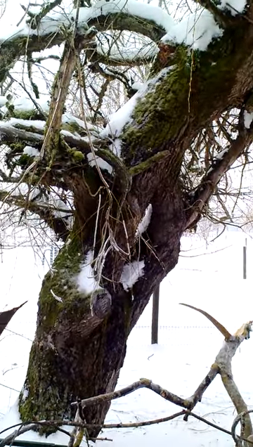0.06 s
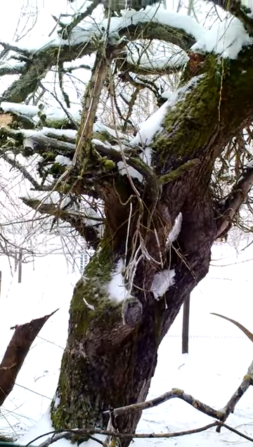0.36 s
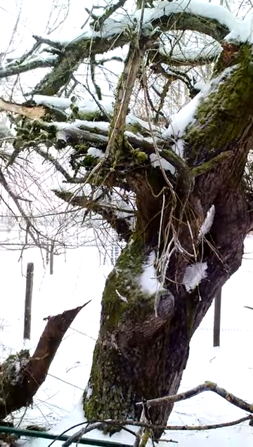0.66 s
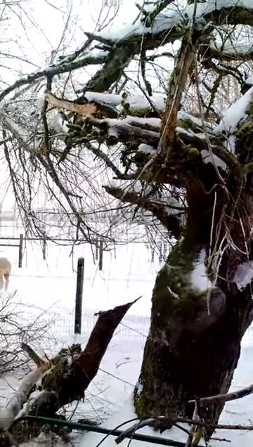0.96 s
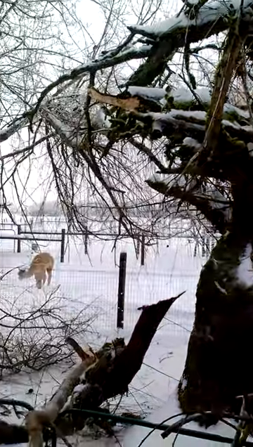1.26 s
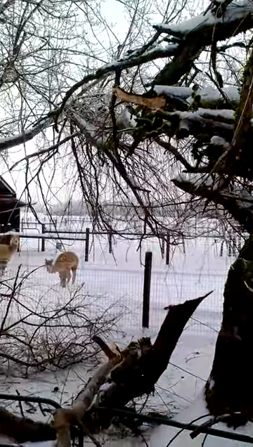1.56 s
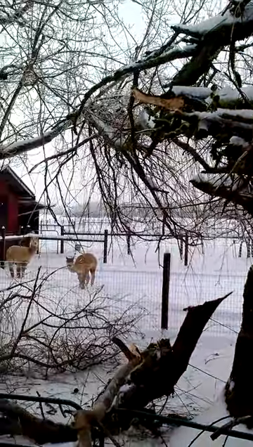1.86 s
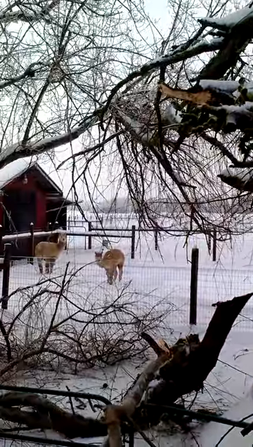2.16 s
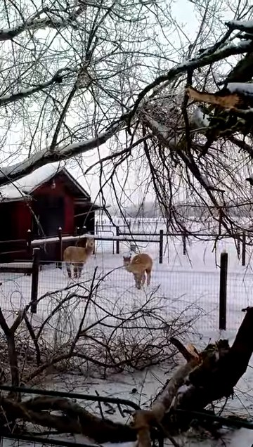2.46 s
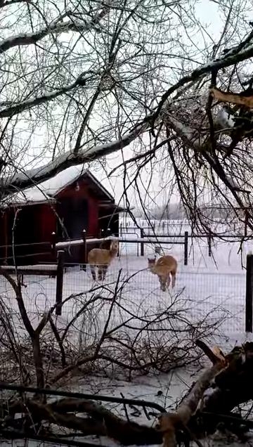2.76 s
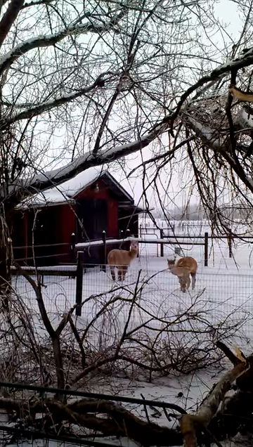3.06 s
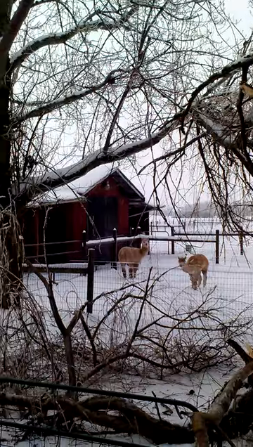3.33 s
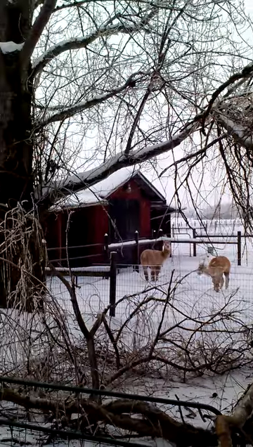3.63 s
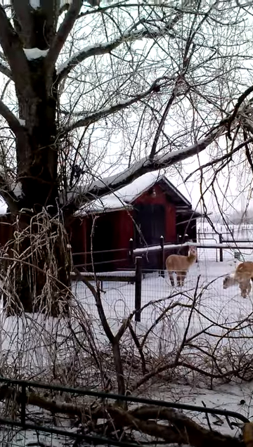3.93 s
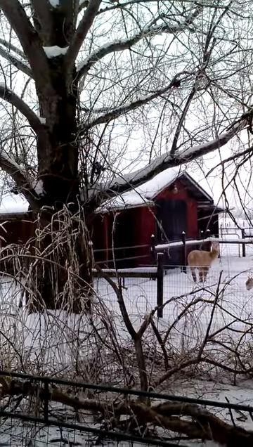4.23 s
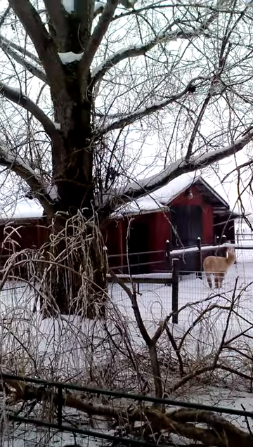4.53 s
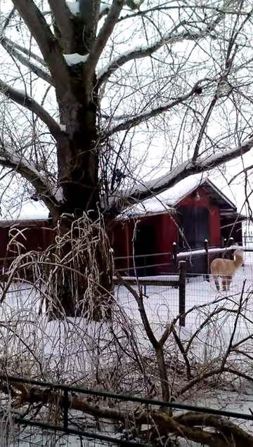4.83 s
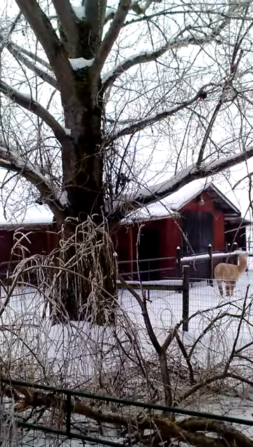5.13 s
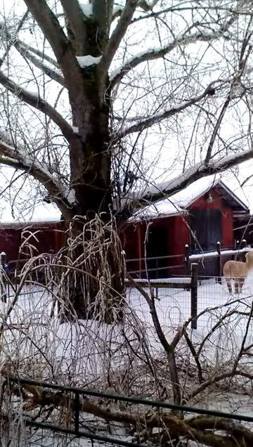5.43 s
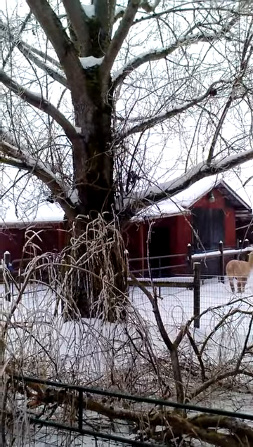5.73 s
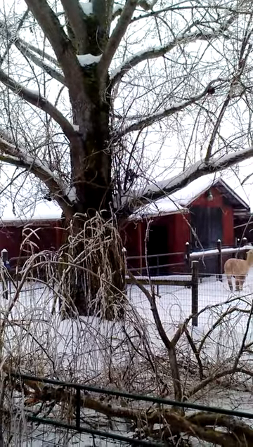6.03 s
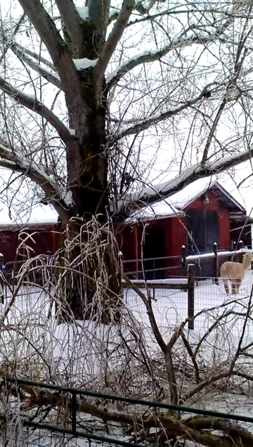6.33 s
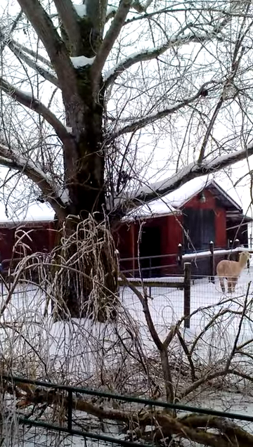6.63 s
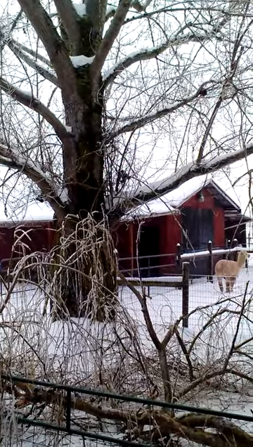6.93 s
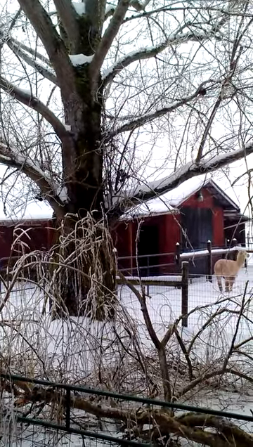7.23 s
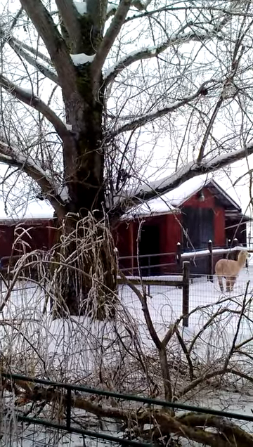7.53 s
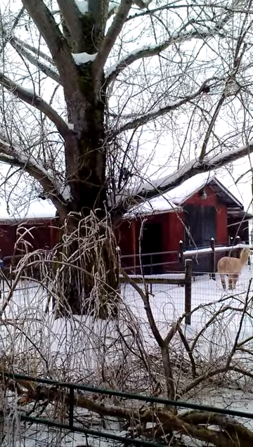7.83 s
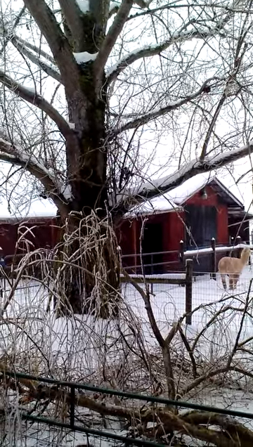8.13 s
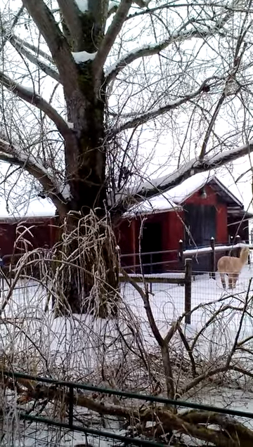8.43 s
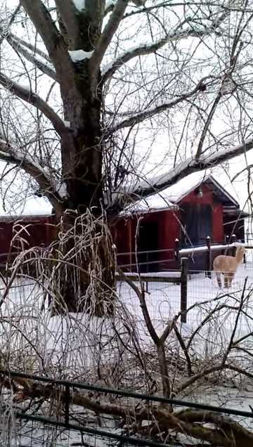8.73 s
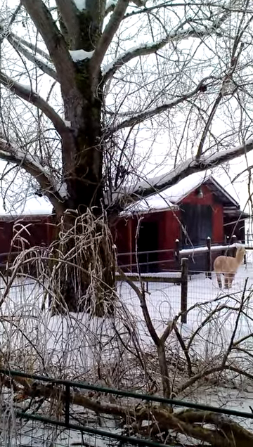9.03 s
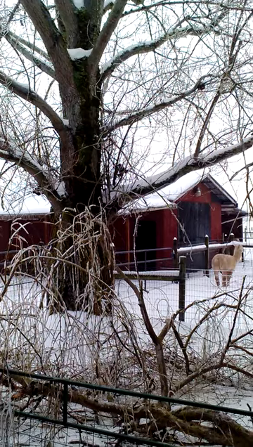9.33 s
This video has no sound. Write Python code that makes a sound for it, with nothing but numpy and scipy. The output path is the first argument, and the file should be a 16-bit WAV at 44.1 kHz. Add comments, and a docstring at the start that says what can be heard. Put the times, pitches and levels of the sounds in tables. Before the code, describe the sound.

Sharp cracks, crumbling crunches and a few solid knocks sound over a dense patter as trees shed their ice onto hard snow. The shower soon dies down to light ticking with occasional small falls. Later a cluster of loud cracks and knocks breaks in, followed by more crackling clumps as the patter slowly grows. It is outdoors in a quiet farmyard with a brief echo, heard through a small mono microphone.

```python
"""Sharp cracks and crumbling ice over a dense patter: thawing branches shed their ice onto crusted snow.
Single pieces fracture the crust and splinter, loose clumps pour down, and solid chunks knock as their
damped modes ring. The heavy shower of small bits dies down to a light patter that slowly picks up again.
Farmyard trunks and sheds scatter a short echo, the open air murmurs, and a small mono microphone
colours it all."""
import sys
import numpy as np
from scipy import signal
from scipy.fft import rfft, irfft
from scipy.io import wavfile
from scipy.ndimage import uniform_filter1d

SR = 44100
rng = np.random.default_rng(int(sys.argv[2]) if len(sys.argv) > 2 else 0)


def wav_record(signal):
    """Record a signal, one row per channel, as 16-bit PCM in the file named by sys.argv[1]."""
    frames = np.transpose(np.atleast_2d(signal))
    bounded = np.clip(frames, -1, 1)
    # unit amplitude maps onto the largest positive 16-bit level
    quanta = np.round(bounded * 32767).astype(np.int16)
    wavfile.write(sys.argv[1], SR, quanta)


N = 422478

# single pieces; thud and brightness shape the spectrum: start_s, crack_db, crumble_db, thud_db, bright_db
PIECES = [(0.0778, -12.5, -19.5, 0.5, -17), (0.0896, -24, -28, 3, -17), (.1043, -15.5, -16, 3, -1.5),
          (0.229, -23, -17, -16, 0), (.2561, -34, -16.5, -10, 4.5), (0.2813, -25.5, -22, -15, 5),
          (0.3222, -17.5, -26.5, -6, -8), (.378, -14.5, -14.5, -9, -19), (0.41, -20, -22, 6, -0.5),
          (0.4347, -20, -26, -3, -9), (0.4461, -16, -17, 5.5, -2), (0.5082, -23, -43, 0, 26),
          (.6018, -20.5, -34, -13, 25), (0.6489, -18, -18.5, -6, 9), (0.7421, -16, -15, -4.5, -2),
          (0.7773, -14, -40, 0.5, 9), (.932, -12, -17.5, -3.5, -3.5), (1.066, -18, -14.5, 7, 7),
          (1.1129, -25, -18.5, -5, 1), (1.2013, -23, -16.5, -1, 12.5), (1.3267, -25.5, -31.5, 11, -7),
          (1.4874, -16.5, -28, -6, -5), (1.5103, -19, -14, 4, 13), (1.5467, -16, -23, -4, -0.5),
          (1.7992, -22, -18, 0, 8), (1.8961, -13, -16.5, -31, 0.5), (1.9243, -23, -25, -10, 13),
          (1.9667, -19, -11.5, -3, 7.5), (2.0447, -22.5, -27.5, -1, -7.5), (2.177, -20, -28, 0, 9),
          (2.4413, -40, -30, -6, 2), (2.465, -30, -28, -21, -1), (2.4917, -25.5, -23, -29, 7),
          (2.8522, -32, -32, -3, 3), (3.376, -41, -28, -7, 5.5), (3.6083, -36, -39, -26, 0),
          (3.863, -35, -40, 7, 5), (4.178, -26.5, -28, -8, -2), (4.4689, -28.5, -43, -2, 11),
          (4.9942, -26, -30, -33, 6), (5.7065, -28, -28, -1, 5.5), (5.5535, -36.5, -41, -2, -4),
          (6.1263, -51, -33.5, -14, 5.5), (6.2825, -23.5, -28, 2.5, 1), (6.429, -15.5, -18.5, 7, 2),
          (6.5841, -29, -22.5, 3, -2.5), (6.6373, -27, -25, -24, 1), (6.7023, -45, -26, -16, 0),
          (6.8702, -11, -15.5, -6, -18), (6.8767, -18, -14.5, -3, 1), (6.9601, -18, -17.5, 1.5, -10),
          (6.9655, -17, -26, 6, -2.5), (7.21, -43, -30, 0, -1), (7.4199, -39, -27.5, -6, 6),
          (7.9411, -32, -37, -8, -6), (7.9892, -48, -28.5, -11, -2), (8.0612, -28, -36.5, -19, 1.5),
          (8.2392, -24, -20.5, 9, -2.5), (8.5314, -24.5, -33, -6, -5), (8.801, -30.5, -24.5, -9, 2.5),
          (8.9223, -27, -37, 12, -4.5), (9.0147, -39, -28, 1, 0), (9.1416, -30.5, -34.5, 6.5, -11),
          (9.183, -27.5, -34, 10, -3.5), (9.2703, -18, -26, -1.5, -25), (9.374, -23.5, -29.5, 8.5, -7),
          (9.557, -27, -38, 1.5, -3)]
# loose clumps: start_s, level_db, t60_s, thud_db, bright_db
CLUMPS = [(.018, -18.5, 0.2, -10, 3), (.328, -16.5, 0.23, 2, -1), (.65, -24, 0.75, 3, 0),
          (.77, -16, 0.55, 5, 0.5), (.945, -23.5, 0.44, 1.5, -8), (1.149, -35, 0.63, -1, 17),
          (1.265, -23.5, 0.47, -4, 1), (1.405, -21, 0.41, 8, -2), (1.819, -29.5, 0.7, 7, -1),
          (1.974, -23, 0.38, 16.5, 7), (2.189, -25.5, 0.48, -8, -1), (2.324, -29, 0.23, -12, 6.5),
          (2.85, -37, 0.3, 12, 2), (2.937, -32.5, 0.14, -16, 8.5), (3.318, -31, 0.2, -11, 17),
          (3.67, -37.5, 0.47, -4, -11), (3.978, -39.5, 0.36, -23, -2), (4.212, -27, 0.34, 4, 2),
          (4.455, -30, 0.19, 0, 1), (4.617, -29, 0.18, 1, 2.5), (5.49, -33.5, 0.13, -14, 11),
          (5.70, -32, 0.34, -1, 7), (5.999, -33.5, 0.26, -3, -5), (6.796, -34.5, 0.22, 0, -3),
          (6.896, -18, 0.17, -9, -0.5), (7.04, -34.5, .4, -2, 7), (7.756, -33.5, 0.19, -15, 4),
          (7.84, -32.5, .22, 9.5, 3), (8.125, -30, 0.4, -4.5, -13), (8.163, -20.5, 0.33, 1, -3),
          (8.28, -24.5, 0.3, -10, 2.5), (8.448, -22.5, 0.25, 0, 5.5), (8.755, -28.5, 0.38, 8, 1),
          (8.951, -29.5, 0.26, -18, 0)]
# solid chunks; others_db lifts all modes but the one at the pitch: start_s, pitch_hz, level_db, others_db
KNOCKS = [(0.376, 188.6, -19, -5.5), (.933, 434, -24, 1), (1.427, 206, -26.5, -15),
          (1.972, 306, -23.5, -25), (2.193, 394.3, -20.5, -6), (2.711, 225, -38, -12),
          (3.865, 390, -48, 12), (4.229, 354, -32.5, -16), (4.995, 2540, -36, -18),
          (5.672, 349, -41.5, -10), (6.4299, 481, -24, -4.5), (6.586, 438, -28.5, 4), (6.872, 398, -17, 2),
          (6.96, 395, -18.5, 4), (7.994, 387, -47.5, 13.5), (8.241, 510, -21.5, -16)]
# modes of a chunk, with decay times for a pitch of MODE_REFERENCE_HZ: pitch_ratio, level_db, t60_s
CHUNK_MODES = [(1, -1, 0.13), (.55, -14.5, 0.14), (1.5, -10, 0.076), (2.4, -1.5, 0.073), (2.9, -6.5, .08),
               (3.7, 3.5, 0.065)]
# spectrum of ice striking the crust: frequency_hz, density_db
IMPACT_SPECTRUM = [(30, -27), (60, -11), (130, -13.5), (220, -3.5), (300, -5.5), (400, -5), (550, -5),
                   (1000, -3), (1650, 0.5), (2700, -1.5), (3300, -6.5), (4500, -7.5), (7000, -9),
                   (10000, -19.5)]
# spectrum of small bits landing on snow: frequency_hz, density_db
PATTER_SPECTRUM = [(30, -56), (70, -5.5), (250, -1), (550, -6.5), (1000, -2), (1750, 2.5), (2800, 1.5),
                   (3600, -6), (6000, -37.5)]
# spectrum of their splinters: frequency_hz, density_db
SIZZLE_SPECTRUM = [(1500, -32), (3000, -7.5), (4000, 0.5), (6500, 2), (8000, -2), (10000, -8)]
# reverberation time of the yard: frequency_hz, t60_s
YARD_DECAY = [(100, 0.27), (500, 0.45), (2000, 0.56), (6000, 0.7)]
# spectrum of the open air: frequency_hz, density_db
AIR_SPECTRUM = [(20, -28), (40, -6.5), (60, -6), (120, -2.5), (220, -8.5), (450, -9), (1000, -10.5),
                (3000, -54)]
# microphone response: frequency_hz, gain_db
MIC_RESPONSE = [(25, -28), (60, 0), (4950, 0), (5550, 7.5), (6400, 6), (7000, 1), (7500, -5.5), (7950, -17),
                (8500, -9.5), (9300, -8.5), (9900, -21)]

# heavy pieces crumble for longer, thin ones settle sooner (dB of length per dB of thud, of brightness)
CRUMBLE_T60_S, LONGER_IF_HEAVY, SHORTER_IF_THIN = 0.11, 0.26, 0.86
MODE_REFERENCE_HZ, DAMPING_EXPONENT = 400, 0.11  # smaller, higher chunks die away sooner
# the heavy shower eases off, then runs out; the light patter grows to either side of its calmest moment
HEAVY_DB, EASE_DB_PER_S, RUNS_OUT_S, RUN_OUT_DB_PER_S = -34, 1.3, 2.085, 25.5
LIGHT_DB, CALM_S, GROW_DB_PER_S, LIGHT_SIZZLE_DB = -51, 4.66, 1.13, 2
YARD_DB, AIR_DB = -11, -56
HZ = np.fft.rfftfreq(4096, 1 / SR)  # frequency axis of the filter spectra


def falling_pieces(fracture_s=0.0006, crack_energy_s=0.003, rise_s=0.0023, dullest_spray_db=-6):
    """Brittle fracture: the crust breaks in a broadband burst, then splinters scatter and settle."""
    out, t = np.zeros(N), np.arange(SR // 4) / SR
    fracture = (t / fracture_s) * np.exp(-t / fracture_s)
    for start_s, crack_db, crumble_db, thud_db, bright_db in PIECES:
        snap = fracture * rng.standard_normal(len(t))
        crack = filtered(snap, impact_spectrum(thud_db, bright_db - 2, deep_db=-17))
        crack *= np.sqrt(crack_energy_s * SR / np.sum(microphone(crack) ** 2))
        thin_db = max(bright_db, dullest_spray_db)  # even a dull piece sheds some thin splinters
        t60_s = CRUMBLE_T60_S * amp(LONGER_IF_HEAVY * thud_db - SHORTER_IF_THIN * thin_db)
        colour_db = impact_spectrum(thud_db, thin_db, deep_db=3)
        crumble = splinters(t, rise_s, t60_s, colour_db, per_s=5000, spread_db=1)
        add(out, start_s, amp(crack_db) * crack + amp(crumble_db) * crumble)
    return out


def clumps(push_db=3, rise_per_t60=0.022):
    """Superposed impacts: a loose clump's crackle swells and trails off as its weight pushes the snow."""
    out, t = np.zeros(N), np.arange(SR // 2) / SR
    for start_s, level_db, t60_s, thud_db, bright_db in CLUMPS:
        colour_db = impact_spectrum(thud_db, bright_db, deep_db=push_db + thud_db)
        crackle = splinters(t, rise_per_t60 * t60_s, t60_s, colour_db, per_s=2200, spread_db=3)
        add(out, start_s, amp(level_db) * crackle)
    return out


def knocks(onset_s=0.00085, rocking_depth=0.5):
    """Modal vibration: a solid chunk rings in a few damped modes, unevenly as it rocks and settles."""
    out, t = np.zeros(N), np.arange(SR // 4) / SR
    for start_s, pitch_hz, level_db, others_db in KNOCKS:
        damping = (pitch_hz / MODE_REFERENCE_HZ) ** DAMPING_EXPONENT
        for k, (pitch_ratio, mode_db, t60_s) in enumerate(CHUNK_MODES):
            hz = pitch_hz * pitch_ratio
            rocking = unit(uniform_filter1d(rng.standard_normal(len(t)), size=round(3 * SR / hz)))
            envelope = (1 - np.exp(-t / onset_s)) * amp(mode_db - 60 * t * damping / t60_s)
            ring = np.sin(2 * np.pi * hz * t) * envelope * (1 + rocking_depth * rocking)
            add(out, start_s, amp(level_db + others_db * (k > 0)) * ring)
    return out


def impact_spectrum(thud_db, bright_db, deep_db, thud_hz=340, bright_hz=3500, deep_hz=120):
    """Size sets the spectrum, in dB: heavy pieces push the snow and thud, thin ones sound bright."""
    deep = 1 / (1 + (HZ / deep_hz) ** 4)
    thud = np.exp(-np.log((HZ + 1) / thud_hz) ** 2 * 2)
    bright = 1 / (1 + (bright_hz / (HZ + 1)) ** 10)
    return curve(IMPACT_SPECTRUM) + deep_db * deep + thud_db * thud + bright_db * bright


def splinters(t, rise_s, t60_s, colour_db, per_s, spread_db):
    """Decaying shot noise: a spray of tiny impacts builds up, then fades exponentially."""
    spray = clicks(len(t), per_s, spread_db) * (1 - np.exp(-t / rise_s))
    settling = amp(-60 * t / max(t60_s, 0.01))
    return filtered(spray * settling, colour_db + shard_resonances(depth_db=2.5, width_bins=22))


def shard_resonances(depth_db, width_bins):
    """Damped resonance: an irregular shard puts broad, random peaks and dips in a dB spectrum."""
    bumps = uniform_filter1d(rng.standard_normal(len(HZ)), width_bins)
    bumps = uniform_filter1d(bumps, width_bins)
    return depth_db * unit(np.tanh(unit(bumps)))


def shower(near_exponent=0.16):
    """Incoherent addition: near bits crunch one by one, those under farther trees merge into a wash."""
    t = np.arange(N) / SR
    heavy = amp(HEAVY_DB - EASE_DB_PER_S * t - RUN_OUT_DB_PER_S * np.maximum(t - RUNS_OUT_S, 0))
    light = amp(LIGHT_DB + GROW_DB_PER_S * abs(t - CALM_S))
    landing = np.hypot(heavy, light)
    splintering = np.hypot(heavy, amp(LIGHT_SIZZLE_DB) * light)
    near = unit(landing) ** near_exponent  # near bits stand out more in a heavy fall
    patter = amp(-1.5) * bits(PATTER_SPECTRUM, per_s=260, spread_db=4, variety_db=6.5, crunch_s=0.01)
    far_patter = amp(-4) * noise(PATTER_SPECTRUM)
    sizzle = amp(-4.5) * bits(SIZZLE_SPECTRUM, per_s=320, spread_db=4, variety_db=2.5, crunch_s=0.0096)
    far_sizzle = amp(-5.5) * noise(SIZZLE_SPECTRUM)
    twig_ticks = amp(-9) * bits(SIZZLE_SPECTRUM, per_s=20, spread_db=3, variety_db=5.5, crunch_s=0.0035)
    return landing * (near * patter + far_patter) + splintering * (near * (sizzle + twig_ticks) + far_sizzle)


def bits(spectrum, per_s, spread_db, variety_db, crunch_s, shapes=24):
    """Shot noise: each shape of bit repeats its own crunch, with a decay time of up to crunch_s."""
    out, t = np.zeros(N), np.arange(SR // 12) / SR
    for decay_s in np.geomspace(crunch_s / 10, crunch_s, shapes):
        burst = rng.standard_normal(len(t)) * np.exp(-t / decay_s)
        colour_db = curve(spectrum) + shard_resonances(variety_db, width_bins=60)
        crunch = filtered(burst / np.linalg.norm(burst), colour_db)
        out += signal.oaconvolve(clicks(N, per_s / shapes, spread_db), crunch)[:N]
    return out / np.sqrt(shapes)


def yard_echo(x, first_echo_s=0.0038, patterns=3, crossfade_hz=1):
    """Scattering off trunks and sheds: echo patterns crossfade, as pieces land in different places."""
    out, phase = np.zeros(N), 2 * np.pi * crossfade_hz * np.arange(N) / SR
    for k in range(patterns):
        echoes = clicks(SR // 2, per_s=2500, spread_db=2) * (np.arange(SR // 2) > first_echo_s * SR)
        hz, t, spectra = signal.stft(echoes, SR, nperseg=256)
        decay = amp(-60 * t / curve(YARD_DECAY, hz)[:, None])
        tail = signal.istft(spectra * decay, SR, nperseg=256)[1]
        share = np.sqrt(2 / patterns) * np.cos(phase + np.pi * k / patterns)
        out += signal.oaconvolve(x * share, tail / np.linalg.norm(tail))[:N]
    return out


def air():
    """Stationary noise: the low, steady murmur of the countryside."""
    return amp(AIR_DB) * noise(AIR_SPECTRUM)


def microphone(x):
    """Port resonance: a small inlet peaks near 6 kHz, has a notch above and loses the deep bass."""
    hz = np.fft.rfftfreq(len(x), 1 / SR)
    return irfft(rfft(x) * amp(curve(MIC_RESPONSE, hz)), len(x))


def clicks(length, per_s, spread_db):
    """Poisson process: randomly timed clicks, many small and a few large."""
    size = amp(spread_db * np.minimum(rng.exponential(1, length), 3.5))
    return unit(size * rng.choice([-1., 1.], length) * (rng.random(length) < per_s / SR))


def noise(spectrum):
    """Spectral shaping: white noise takes the colour of a spectrum table."""
    return filtered(rng.standard_normal(N), curve(spectrum))


def filtered(x, spectrum_db):
    """Minimum phase: filters by this spectrum's sharpest causal pulse, of unit energy at the output of
    the microphone."""
    log_gain = np.log(amp(np.r_[spectrum_db, spectrum_db[-2:0:-1]]))
    pulse = np.fft.ifft(np.exp(np.conj(signal.hilbert(log_gain)))).real[:len(HZ)]
    heard_rms = np.sqrt(np.mean(amp(spectrum_db + curve(MIC_RESPONSE)) ** 2))
    return signal.oaconvolve(x, pulse / heard_rms)[:len(x)]


def curve(table, hz=HZ):
    """Interpolation of a table on a log-frequency axis."""
    table_hz, values = np.transpose(table)
    return np.interp(np.log(hz + 1), np.log(table_hz + 1), values)


def add(mix, start_s, sound):
    """Superposition of a sound on the mix from start_s."""
    part = mix[max(0, round(start_s * SR)):][:len(sound)]
    part += sound[:len(part)]


def amp(db):
    """Amplitude ratio of a level in decibels."""
    return 10 ** (np.asarray(db) / 20)


def unit(x):
    """Normalisation to an rms of one."""
    return x / np.sqrt(np.mean(x ** 2) + 1e-20)


def scene():
    """Superposition of the direct sound of the ice, its echo and the open air."""
    ice = falling_pieces() + clumps() + knocks() + shower()
    return (ice + amp(YARD_DB) * yard_echo(ice) + air())[None]


def record(dry, overload=0.93, cutoff_hz=10150):
    """Transduction: microphone colour, clipping of any peak past overload, then a band limit."""
    clipped = np.clip(microphone(dry[0]), -overload, overload)
    lowpass = signal.firwin(301, cutoff_hz, window=("kaiser", 8), fs=SR)
    return signal.oaconvolve(clipped, lowpass, "same")[None]


dry = scene()
out = record(dry)
wav_record(out)
```